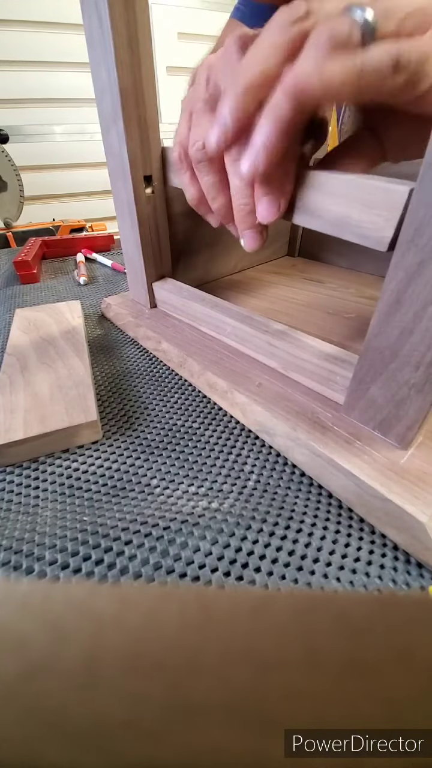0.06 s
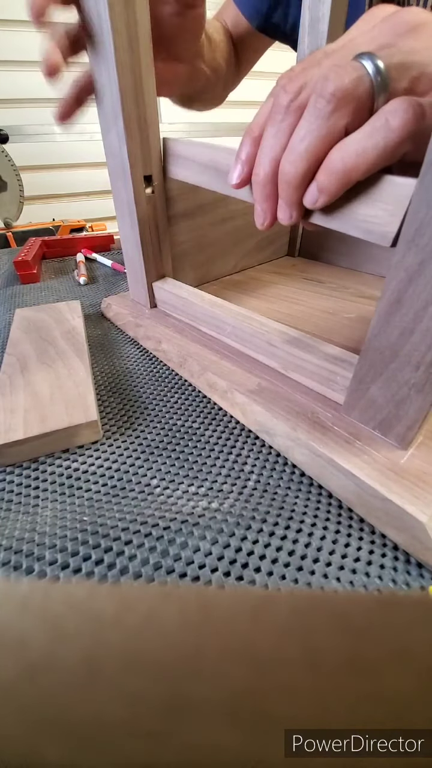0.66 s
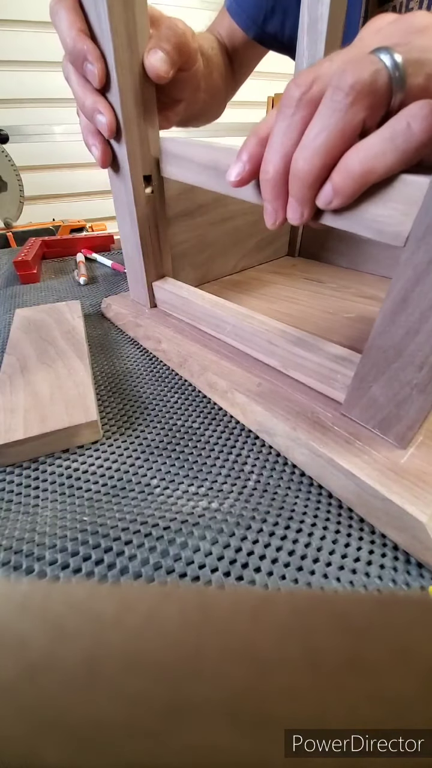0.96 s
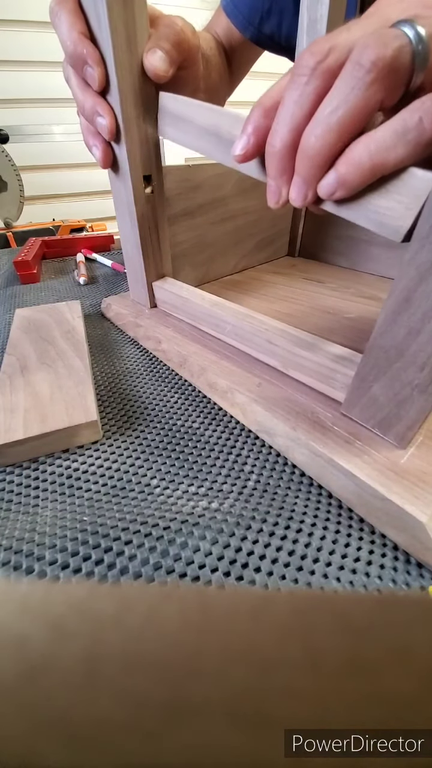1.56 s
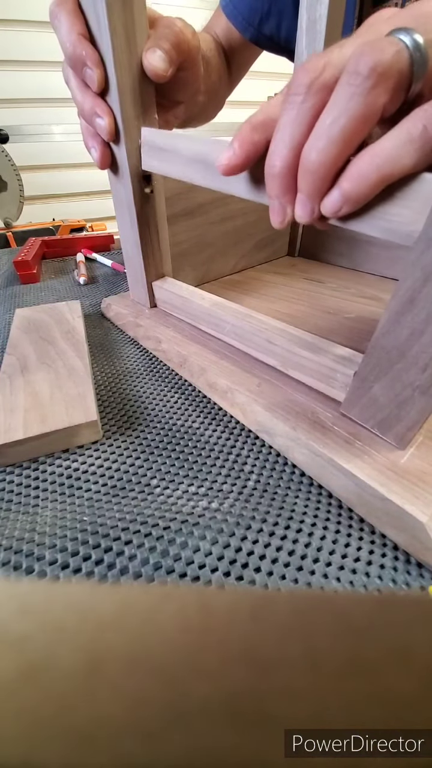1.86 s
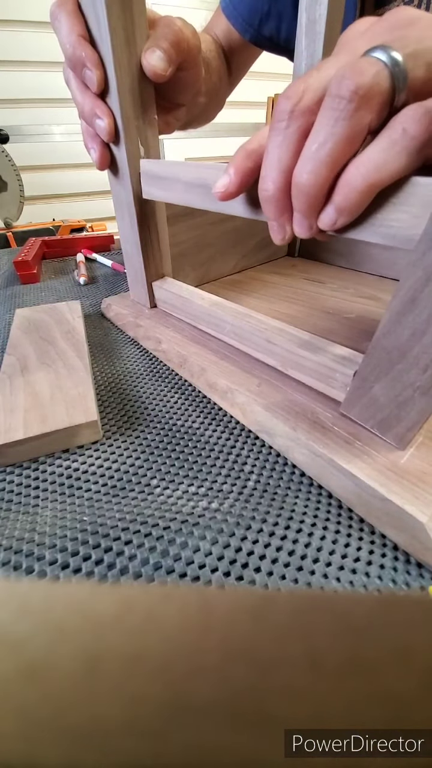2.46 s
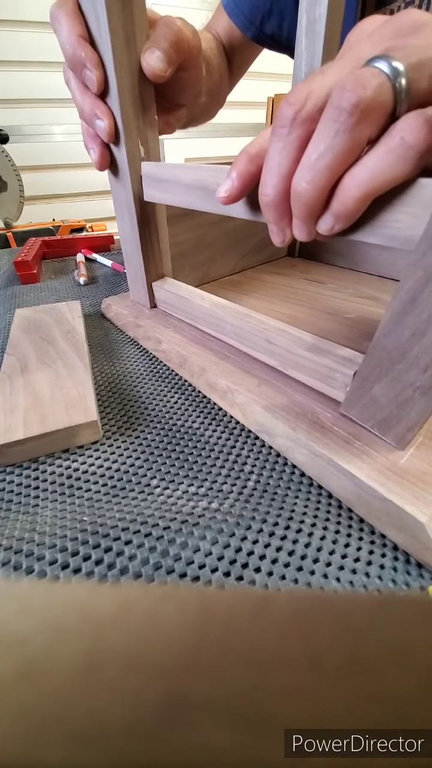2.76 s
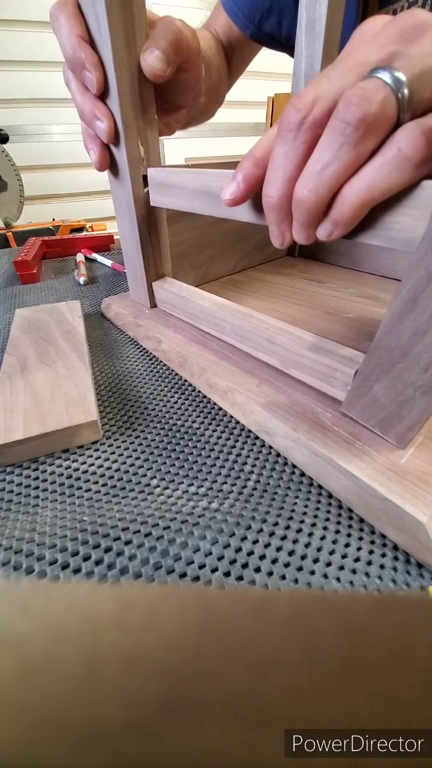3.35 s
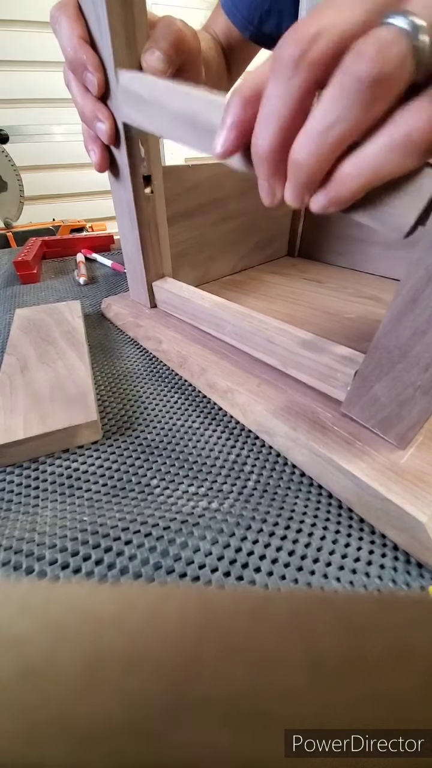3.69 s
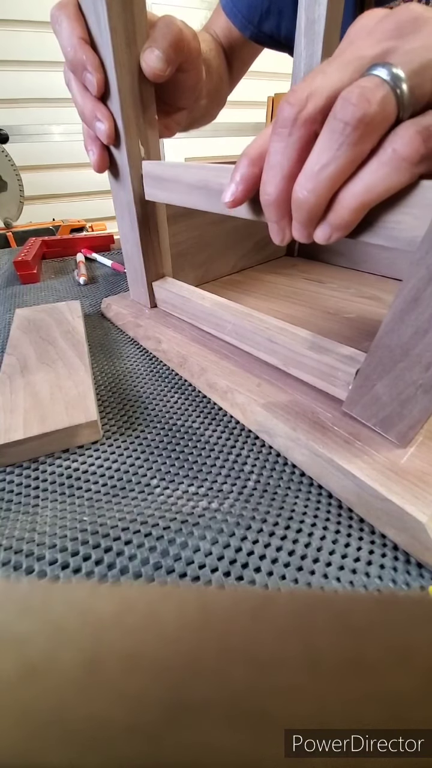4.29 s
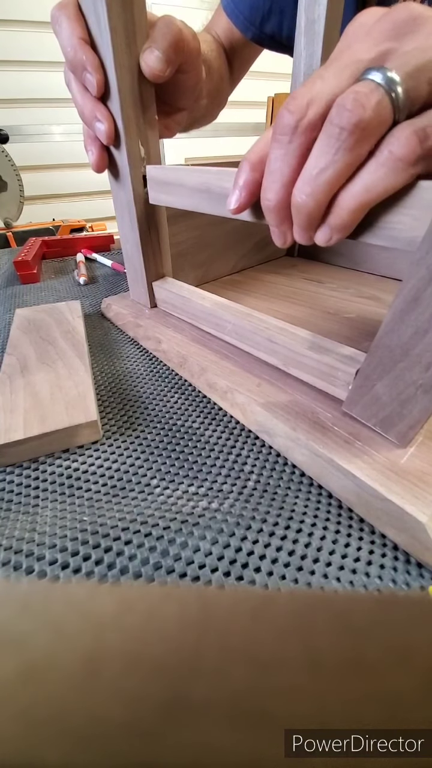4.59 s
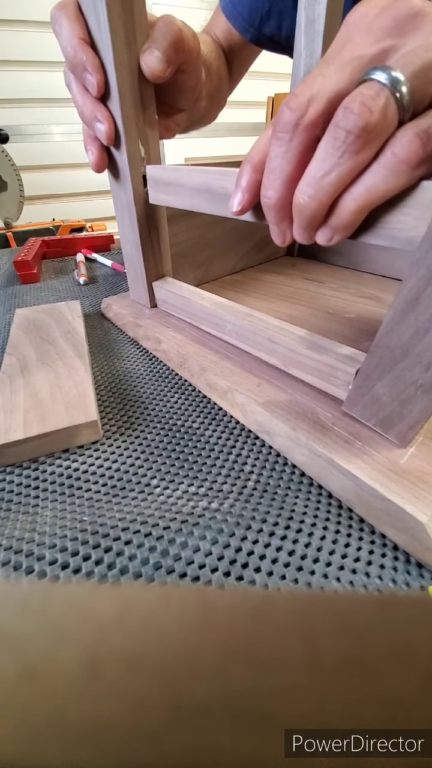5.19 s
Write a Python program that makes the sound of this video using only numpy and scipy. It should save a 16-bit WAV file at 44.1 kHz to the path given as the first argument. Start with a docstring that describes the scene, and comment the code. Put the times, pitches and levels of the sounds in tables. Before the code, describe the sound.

A wooden rail taps, rubs and knocks lightly against a small wooden frame on a workbench, over a low rumble and faint hiss.

```python
"""A wooden rail is tried between the legs of a small hardwood frame on a padded workbench.
From the start, a two-port microphone lying on the bench picks up a low rumble and a faint hiss.
For 2.5 seconds the rail taps the legs, making rail and frame ring briefly, while fingers and wood rub.
After a pause come the hardest knocks, which thump the bench, at around 4 seconds.
One last knock follows, and a faint whine comes up near the end."""
import sys
import numpy as np
from scipy import signal
from scipy.fft import rfft, irfft
from scipy.io import wavfile
from scipy.ndimage import uniform_filter1d

SR = 44100
rng = np.random.default_rng(int(sys.argv[2]) if len(sys.argv) > 2 else 0)


def store_wav(level_fs):
    """Save 16-bit WAV to argv[1]."""
    pcm = np.round(np.clip(np.atleast_2d(level_fs), -1, 1) * 32767)
    wavfile.write(sys.argv[1], SR, pcm.T.astype(np.int16))


N = 235135

# How much louder the microphone's left port is than its right: pitch_hz, difference_db
PORT_BALANCE = [(60, -2.5), (130, -6), (195, -11), (270, 1), (450, 1.5), (620, 0), (810, -5), (1200, -1.5),
                (1450, 4.5), (1900, 14.5), (3000, 6), (6000, -1), (9500, -1), (13000, 8), (15500, 10.5)]
LEFT_RIGHT = np.array([[.5], [-.5]])  # shares a difference between the two channels


def amp(db):
    """Turns decibels into a gain."""
    return 10 ** (np.asarray(db) / 20)


def unit(x):
    """Scales a sound to an average (rms) level of 1."""
    return x / np.sqrt(np.mean(x ** 2) + 1e-30)


def read(points, hz):
    """Looks up a table between its rows, on a scale of octaves."""
    pitch_hz, value = np.transpose(points)
    return np.interp(np.log(hz + 1), np.log(pitch_hz + 1), value)


def tint(x, points):
    """Gives a sound the tone colour in a table."""
    hz = np.fft.rfftfreq(x.shape[-1], 1 / SR)
    return irfft(rfft(x) * amp(read(points, hz)), x.shape[-1])


def fade(points):
    """Turns rows of time_s, level_db into a gain for every sample."""
    return amp(np.interp(np.arange(N) / SR, *np.transpose(points)))


def add(mix, start_s, sound):
    """Mixes a stereo sound in, dropping whatever falls outside the scene."""
    start = round(start_s * SR)
    sound = sound[:, max(-start, 0):]
    part = mix[:, max(start, 0):][:, :sound.shape[1]]
    part += sound[:, :part.shape[1]]


def bench_rumble(deep_db=-1.0, upper_db=2):
    """Shifting weight shakes the bench; sliding palms add a softer, higher rumble."""
    # How each rumble swells and fades: time_s, relative_db
    deep_levels = [(0, -55.5), (0.149, -47.5), (.33, -59.5), (.5, -48.5), (.77, -55), (.9, -71),
                   (1.049, -48), (1.241, -53), (1.381, -59), (1.69, -67.5), (1.76, -51), (2.3, -55.5),
                   (2.96, -50), (3.13, -65.5), (3.25, -55), (4.55, -58), (4.821, -51), (5.15, -62)]
    upper_levels = [(0.0, -61), (0.28, -68.5), (1.01, -67), (1.16, -68.5), (1.81, -75), (2.45, -67.5),
                    (3.04, -72.5), (3.27, -77), (3.44, -72.5), (3.86, -71), (3.98, -73), (4.17, -70),
                    (4.96, -76.5), (5.33, -74.5)]
    # Tone colour of each rumble: pitch_hz, relative_db
    deep_colour = [(15, -24), (30, -5.5), (52, -4.5), (82, 1.5), (110, -4.5), (150, -19.5), (250, -49.5),
                   (600, -93)]
    upper_colour = [(70, -35.5), (140, -10.5), (195, -0.5), (280, -12.5), (350, -11.5), (500, -21),
                    (900, -22.5), (3000, -84.5)]
    deep = unit(tint(rng.standard_normal((2, N)), deep_colour)) * fade(deep_levels)
    upper = unit(tint(rng.standard_normal((2, N)), upper_colour)) * fade(upper_levels)
    return amp(deep_db) * deep + amp(upper_db) * upper


def hiss(level_db=-77, left_over_right_db=4):
    """Shop air and microphone noise make a steady hiss, unrelated at the two ports."""
    # Tone colour of the hiss: pitch_hz, relative_db
    colour = [(40, -12), (350, 1.5), (650, -12.5), (1200, 1), (1700, -4), (2500, -11.5), (3600, -12),
              (4400, -9), (5600, -16.5), (6700, -6.5), (7500, -22), (9300, -20.5), (12000, -14),
              (15500, -15.5)]
    noise = unit(tint(rng.standard_normal((2, N)), colour))
    return noise * amp(level_db + left_over_right_db * LEFT_RIGHT)


def knocks(size=16384, lead_s=.05, noise_gain=2.36, noise_above_hz=260, blow_s=0.00043, edge=0.34):
    """Each knock has a soft, blurred attack: a brief noise swells and fades around one main blow."""
    # One knock a row: start_s, strength_db, dull_above_hz, scuff_db, thump_db, rail_share (0-1),
    # rise_s, fall_s, grip (1 = usual), spot_hz, rail_pitch (ratio, higher when wedged)
    hits = [(0.088, -36.5, 940, -96, -52.5, 0.79, 0.0047, 0.003, 1.04, 1190, 1.02),
            (0.197, -52, 453, -72.5, -51.5, 0.58, 0.0098, 0.0088, 1.0, 457, 1),
            (0.577, -34.5, 400, -67, -49.5, 0.23, 0.004, 0.0016, 1.75, 260, 1.18),
            (0.591, -46, 350, -70, -49.5, 0.1, 0.002, 0.004, 1.7, 275, 0.94),
            (0.717, -44, 690, -69.5, -67, 0.99, 0.0088, 0.006, 1.3, 480, 1.04),
            (0.984, -45, 303, -73.5, -44, 0.05, 0.013, 0.0053, 0.99, 343, 1.3),
            (1.1251, -33.5, 1270, -75, -48, 0.97, 0.0048, 0.006, 1.46, 2050, 0.985),
            (1.567, -41, 425, -81, -58, 0.54, 0.0057, 0.0032, 1.43, 605, 1.01),
            (1.8, -61, 3000, -58.5, -74, 0.64, 0.0054, 0.0027, 1.1, 3200, 1.12),
            (1.916, -51.5, 566, -86, -56.5, 0.3, 0.0087, 0.0026, 1.2, 620, 0.89),
            (1.995, -58, 2125, -71, -40.5, 0.54, 0.0046, 0.0045, 1.2, 131, 0.98),
            (3.344, -42.5, 433, -48.5, -32, 0.46, 0.004, 0.0049, 1.1, 460, 1.03),
            (3.795, -35, 520, -61, -36.5, 0.2, 0.0033, 0.0038, 0.94, 187, 1.26),
            (3.809, -30.5, 730, -67, -50, 0.26, 0.0023, 0.004, 0.9, 630, 1.02),
            (3.862, -23, 740, -40.5, -38, 0.32, 0.0051, 0.004, 2.16, 620, 1.035),
            (3.9478, -29.5, 690, -71, -36.5, 0.29, 0.0037, 0.003, 1.6, 912, 0.83),
            (4.087, -34.5, 905, -55, -48.5, 0.18, 0.0058, 0.005, 1.4, 807, 0.65),
            (4.097, -22, 900, -53, -42, 0.15, 0.0043, 0.0025, 1.05, 805, 0.98),
            (4.1137, -25.5, 330, -69.5, -24.5, 0.2, 0.0017, 0.003, 1.35, 410, 0.84),
            (4.759, -45, 570, -57.5, -33.5, 0.63, 0.0056, 0.0075, 1.73, 174, 1.03)]
    # Tone colour of a blow: pitch_hz, relative_db
    blow_colour = [(25, -20.5), (70, 15), (115, 6.5), (175, 12), (280, -3.5), (430, -2.5), (600, -2),
                   (900, 2), (1300, 1.5), (2500, 2), (4000, -26), (6500, -34.5), (9000, -45.5),
                   (13500, -43), (15500, -36)]
    out, t = np.zeros((2, N)), np.arange(size) / SR
    since = t - t[round(lead_s * SR)]
    rounded = np.exp(-(since / blow_s) ** 2)
    blow = rounded / rounded.sum() + edge * (since == 0)
    colour = colour_after_blow(blow_colour, size)
    bass_cut = signal.butter(1, noise_above_hz, "high", fs=SR)
    for (start_s, strength_db, dull_above_hz, scuff_db, thump_db, rail_share,
         rise_s, fall_s, grip, spot_hz, rail_pitch) in hits:
        levels_db = band_levels(strength_db, dull_above_hz, scuff_db, thump_db, rail_share,
                                scuff_db_per_octave=1.43)
        swell = np.exp(np.minimum(since / rise_s, -since / fall_s))
        swell *= wobble(size, depth_db=-1.0, wobble_samples=30)
        noise = rng.standard_normal(size) + rng.standard_normal((2, size))
        noise_burst = signal.lfilter(*bass_cut, unit(swell * noise) / np.sqrt(size))
        attack = rfft(blow + noise_gain * noise_burst) * colour
        wood = wood_ring(t, rail_share, grip, spot_hz, rail_pitch, ring_db=1, spot_db=6)
        echo = shop_echo(t, high_db=-2, high_fade_s=0.21)
        add(out, start_s - lead_s, set_bands(attack * wood * echo, levels_db))
    return out


def colour_after_blow(points, size):
    """Spectrum of a tone colour that rings only after the blow, never before it."""
    log_gain = np.log(amp(read(points, np.fft.rfftfreq(size, 1 / SR))))
    only_after = 1 + np.sign(np.fft.fftfreq(size))
    return np.exp(rfft(irfft(log_gain) * only_after))


def band_levels(strength_db, dull_above_hz, scuff_db, thump_db, rail_share, scuff_db_per_octave,
                rise_db_per_octave=5, dull_db_per_octave=13):
    """Levels of thump, body, clack, crack and tick: harder contact is brighter; scuffing adds a rasp."""
    # Middles of body, clack, crack and tick: pitch_hz
    middles_hz = [450, 1000, 2400, 8000]
    # What the rail adds to those bands, compared with the frame: gain_db
    rail_gains_db = [0.5, -10, -6.5, 3.5]
    hz = np.array(middles_hz)
    octaves = np.log2(hz / dull_above_hz)
    push_db = strength_db + np.minimum(rise_db_per_octave * octaves, -dull_db_per_octave * octaves)
    push = amp(push_db + rail_share * np.array(rail_gains_db))
    scuff = amp(scuff_db + scuff_db_per_octave * np.log2(hz / hz[-1]))
    return [thump_db, *20 * np.log10(np.hypot(push, scuff))]


def wobble(size, depth_db, wobble_samples):
    """A gain that wavers quickly at random."""
    return amp(depth_db * unit(uniform_filter1d(rng.standard_normal(size), wobble_samples)))


def wood_ring(t, rail_share, grip, spot_hz, rail_pitch, ring_db, spot_db,
              spot_octaves=0.18, vary_db=1.5, left_delay_s=0.0002865):
    """Spectrum of a dead blow plus the ringing notes of frame and rail; a firmer grip cuts them short."""
    # Notes of the frame on the bench and of the hand-held rail:
    # pitch_hz, relative_db, fade_s (to fall 60 dB at the usual grip), left_lead_rad
    frame_notes = [(71, 8, 0.26, 1), (159.6, 21.5, 0.15, 0.67), (187, 18, 0.1, -0.66),
                   (275, 8.5, 0.028, 1.5), (343, 7, 0.12, -0.8), (400.5, 5.5, 0.07, 1),
                   (463, 15, 0.09, -0.7), (542.4, 13, 0.05, 1.6), (620, 13.5, 0.061, 3.0),
                   (809.3, 15.5, 0.047, -1.53), (912, 10.5, 0.15, 0), (1053, 8.5, 0.11, 3),
                   (1247, 4, 0.06, 2.05), (1367, -3, 0.1, -1), (1550, 0, 0.15, 0.5), (1748, 8, 0.036, 4.1),
                   (2050, 5.5, 0.06, 0.5), (2304, 4, 0.046, 0.2), (2580, 0, 0.018, 3),
                   (3200, 1.5, 0.02, -0.5)]
    rail_notes = [(85.5, 21.5, 0.43, 0.5), (451, 20, 0.11, 2.0), (600, 17.5, 0.065, 3), (682, 8, 0.11, 2.5),
                  (900, 10.5, 0.025, -1), (1157, 15.5, 0.045, -2), (1890, 3.5, 0.046, -0.1),
                  (2081, 10.5, 0.016, -1), (2240, 8.5, 0.03, -0.7), (2580, 4, 0.023, 0.3),
                  (4370, 4, 0.01, 0.25)]
    hz = np.fft.rfftfreq(len(t), 1 / SR)
    spectrum = np.exp(-2j * np.pi * hz * np.array([[left_delay_s], [0]]))  # the right port is nearer
    for notes, share, tuning in (frame_notes, 1 - rail_share, 1), (rail_notes, rail_share, rail_pitch):
        for pitch_hz, relative_db, fade_s, left_lead_rad in notes:
            # The touched spot favours notes near spot_hz.
            favour_db = spot_db * np.exp(-(np.log2(pitch_hz / spot_hz) / spot_octaves) ** 2)
            gain = share * amp(relative_db + ring_db + favour_db + vary_db * rng.standard_normal())
            half_width_hz = np.log(1000) / (2 * np.pi * fade_s)
            note = gain / (grip + 1j * (hz - tuning * pitch_hz) / half_width_hz)
            spectrum += np.exp(1j * left_lead_rad * LEFT_RIGHT) * note
    return spectrum * amp(read(PORT_BALANCE, hz) * LEFT_RIGHT)


def shop_echo(t, high_db, high_fade_s, low_db=-7.0, low_fade_s=0.12, split_hz=3000, onset_s=0.0037):
    """Spectrum of the direct sound plus a short echo; the shop's hard walls keep the treble longest."""
    hz = np.linspace(1, SR / 2, len(t) // 2 + 1)
    treble = 1 / (1 + (split_hz / hz) ** 2)
    build_up = 1 - np.exp(-(t / onset_s) ** 2)
    spectrum = 1
    for band, db, fade_s in (1 - treble, low_db, low_fade_s), (treble, high_db, high_fade_s):
        echo = rng.standard_normal((2, len(t))) * np.exp(-np.log(1000) * t / fade_s) * build_up
        spectrum = spectrum + band * amp(db) * rfft(unit(echo)) / np.sqrt(len(t))
    return spectrum


def set_bands(spectrum, levels_db, window_samples=350):
    """Turns a spectrum into sound, bringing each band's loudest moment to its given level."""
    # Borders between thump, body, clack, crack and tick: pitch_hz
    borders_hz = [280, 700, 1500, 4000]
    hz = np.linspace(0, SR / 2, spectrum.shape[1])
    below = [0] + [1 / (1 + (hz / border) ** 8) for border in borders_hz] + [1]
    sound = 0
    for low, high, db in zip(below, below[1:], levels_db):
        band = irfft(spectrum * (high - low))
        peak_power = uniform_filter1d((band ** 2).mean(0), window_samples).max()
        sound = sound + amp(db) * band / np.sqrt(peak_power + 1e-30)
    return sound


def finger_slips(size=16384, lead_s=0.16, pivot_hz=9000):
    """Dry fingertips slip over sanded wood: a grainy, high whisper too light to ring the frame."""
    # One slip a row: middle_s, strength_db, half_length_s, brightness_db_per_octave
    slips = [(0.186, -73, 0.048, 6.5), (0.371, -67, 0.029, -3), (0.509, -66, 0.035, 1.5),
             (0.592, -60.5, 0.014, 13), (0.914, -59.5, 0.0098, 3), (0.98, -80, 0.075, -3)]
    # Tone colour of skin on wood: pitch_hz, relative_db
    skin_colour = [(500, -23), (2400, -14.5), (3800, -17), (4450, -0.5), (5200, -8), (6800, 2), (7700, -8),
                   (9000, -12.5), (11500, -7), (14000, -5), (15500, -9)]
    out, t = np.zeros((2, N)), np.arange(size) / SR
    hz = np.fft.rfftfreq(size, 1 / SR)
    skin_db = read(skin_colour, hz) + read(PORT_BALANCE, hz) * LEFT_RIGHT
    for middle_s, strength_db, half_length_s, brightness in slips:
        swell = np.exp(-.5 * ((t - lead_s) / half_length_s) ** 2)
        pressure = swell * wobble(size, depth_db=1.5, wobble_samples=200)
        colour = amp(skin_db + brightness * np.log2((hz + 1) / pivot_hz))
        whisper = pressure * unit(irfft(rfft(friction(size)) * colour))
        echo = shop_echo(t, high_db=-2.5, high_fade_s=0.27)
        add(out, middle_s - lead_s, amp(strength_db) * irfft(rfft(whisper) * echo))
    return out


def friction(size, spread_db=7):
    """Many tiny slips of uneven strength make a grainy noise."""
    return rng.standard_normal((2, size)) * amp(spread_db * rng.standard_normal(size))


def wood_rubs(size=16384, lead_s=0.14, sharpness=1.33):
    """The grain catches and lets go as each stroke swells and fades, ringing frame and rail."""
    # One stroke a row: middle_s, strength_db, dull_above_hz, scuff_db, thump_db,
    # rail_share (0-1), half_length_s, grip (1 = usual)
    strokes = [(0.201, -60, 375, -74, -88, 0.55, 0.026, 1.3),
               (0.469, -54, 328, -83.5, -61, 0.14, 0.015, 1.9),
               (0.527, -65, 380, -72, -57, 0.67, 0.023, 1.5),
               (0.594, -60, 1960, -67.5, -68, 0.32, 0.013, 2.5),
               (0.744, -63, 705, -82.5, -50.5, 1, 0.04, 0.91),
               (0.855, -57, 280, -93, -53.5, 0.2, 0.014, 0.88),
               (0.926, -61.5, 3000, -75, -56, 0.23, 0.016, 2.8),
               (1.481, -39, 1690, -80, -59, 0.87, 0.012, 0.99),
               (1.596, -62, 1585, -83, -59, 0.5, 0.019, 1.3), (1.774, -86, 397, -93, -52, 1, 0.06, 0.84),
               (1.899, -66, 1780, -62.5, -56, 0.56, 0.02, 1.2),
               (1.988, -59.5, 1830, -70.5, -75, 0.33, 0.011, 0.64),
               (2.236, -60.5, 1630, -75, -51, 0.26, 0.01, 2), (2.438, -74, 1500, -81, -44, 0.2, 0.015, 2.0),
               (2.464, -57.5, 2600, -61.5, -53, 0.27, 0.014, 2.6),
               (3.829, -45.5, 597, -60.5, -53, 0.15, 0.014, 1.9),
               (3.893, -45, 500, -51, -35.5, 0.88, 0.0048, 1.4),
               (4.118, -42, 1200, -60.5, -58, 0.2, 0.012, 1.2)]
    # Tone colour of a stroke: pitch_hz, relative_db
    stroke_colour = [(25, 13.5), (80, 20.5), (200, 16.5), (500, -11), (1200, -16.5), (2300, -15),
                     (3900, -19.5), (4400, -14), (5000, -16.5), (5700, -7), (7000, -17.5), (9000, -22.5),
                     (12500, -16), (15000, -18)]
    out, t = np.zeros((2, N)), np.arange(size) / SR
    for (middle_s, strength_db, dull_above_hz, scuff_db, thump_db,
         rail_share, half_length_s, grip) in strokes:
        levels_db = band_levels(strength_db, dull_above_hz, scuff_db, thump_db, rail_share,
                                scuff_db_per_octave=-1)
        swell = np.exp(-.5 * abs((t - lead_s) / half_length_s) ** sharpness)
        pressure = swell * wobble(size, depth_db=2.0, wobble_samples=130)
        force = rfft(tint(pressure * friction(size), stroke_colour))
        wood = wood_ring(t, rail_share, grip, spot_hz=520, rail_pitch=1, ring_db=4, spot_db=5)
        echo = shop_echo(t, high_db=-2.5, high_fade_s=0.137)
        add(out, middle_s - lead_s, set_bands(force * wood * echo, levels_db))
    return out


def whine(pitch_hz=1152, half_width_hz=37, gain_db=3):
    """A narrow band of noise makes a faint, fuzzy tone that comes up near the end."""
    # How the whine swells: time_s, relative_db
    levels = [(2.2, -100), (4.2, -103.5), (4.751, -86.5), (5.001, -82), (5.33, -82)]
    hz = np.fft.rfftfreq(N, 1 / SR)
    band = 1 / (1 + ((hz - pitch_hz) / half_width_hz) ** 2)
    tone = irfft(rfft(rng.standard_normal((2, N))) * band, N)
    return unit(tone) * fade(levels) * amp(gain_db)


def scene():
    """Knocks, rubs and fingertips over the quiet shop."""
    return knocks() + wood_rubs() + finger_slips() + bench_rumble() + hiss() + whine()


def record(dry, cutoff_hz=15550):
    """Cuts off the very highest treble."""
    lowpass = signal.firwin(511, cutoff_hz, window=("kaiser", 9), fs=SR)
    return signal.oaconvolve(dry, lowpass[None], "same")


dry = scene()
out = record(dry)
store_wav(out)
```